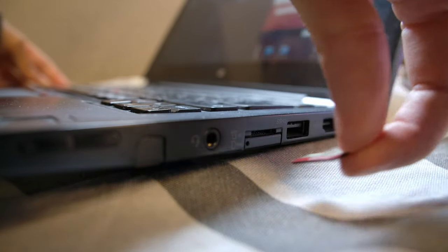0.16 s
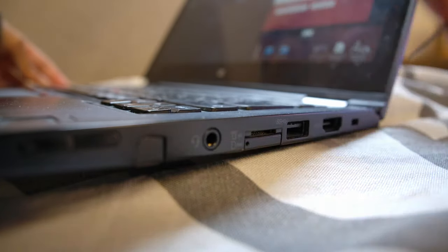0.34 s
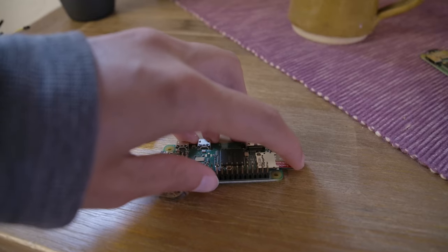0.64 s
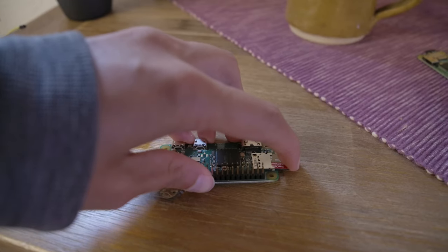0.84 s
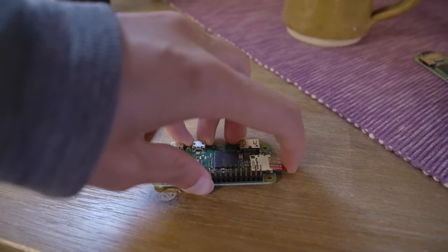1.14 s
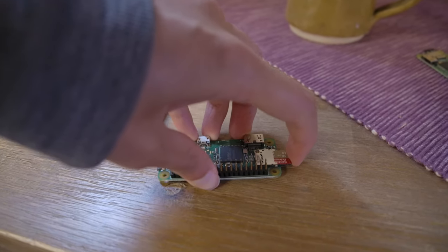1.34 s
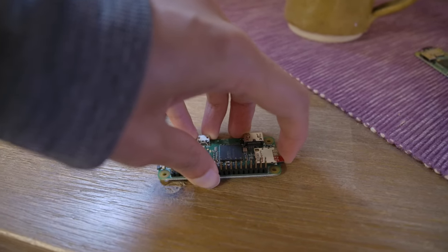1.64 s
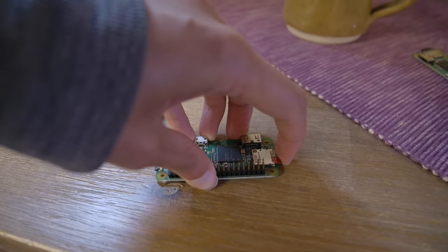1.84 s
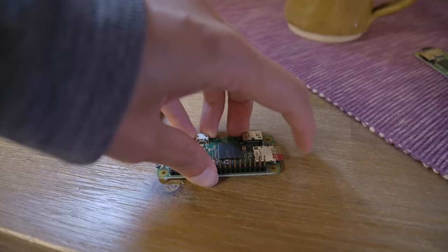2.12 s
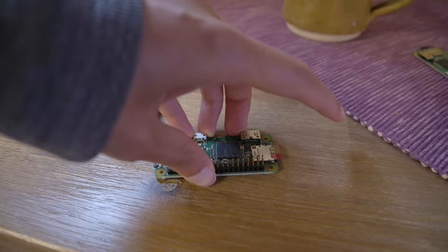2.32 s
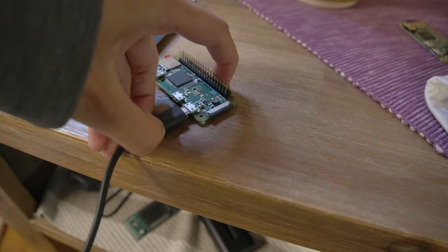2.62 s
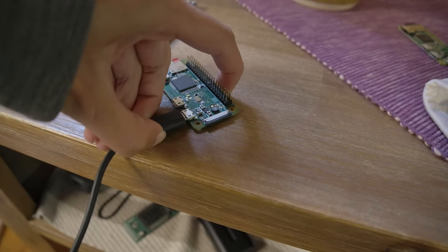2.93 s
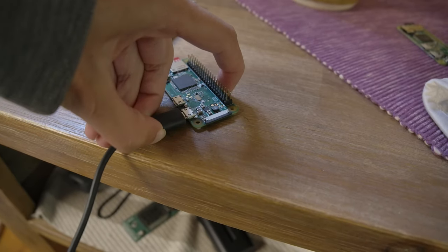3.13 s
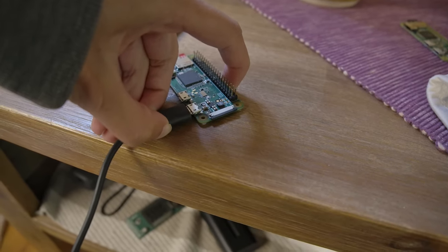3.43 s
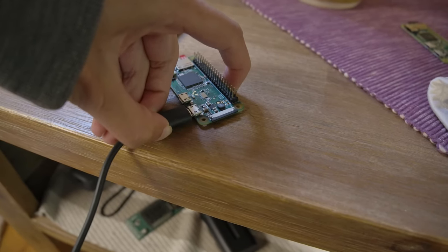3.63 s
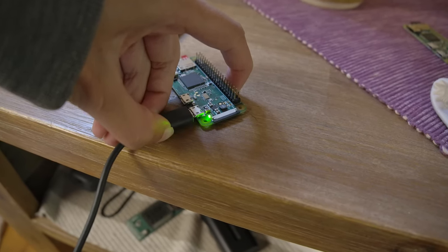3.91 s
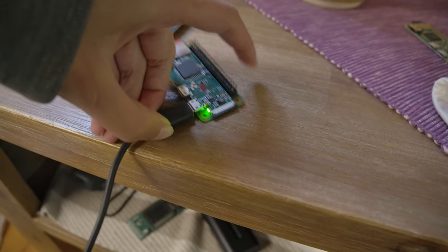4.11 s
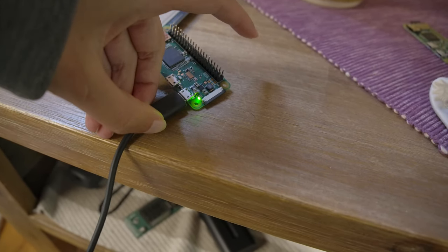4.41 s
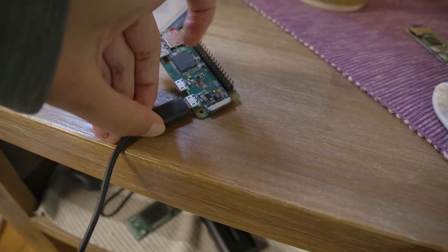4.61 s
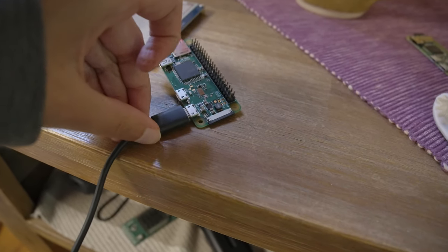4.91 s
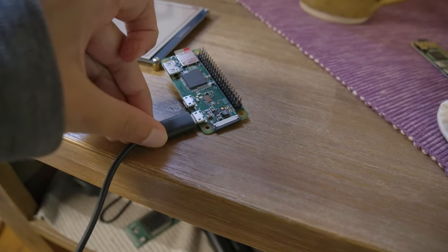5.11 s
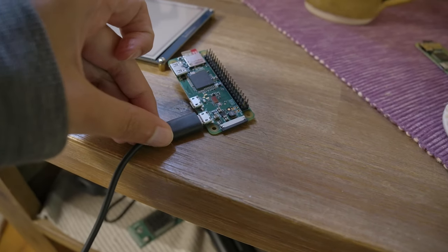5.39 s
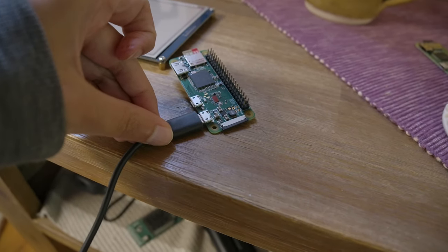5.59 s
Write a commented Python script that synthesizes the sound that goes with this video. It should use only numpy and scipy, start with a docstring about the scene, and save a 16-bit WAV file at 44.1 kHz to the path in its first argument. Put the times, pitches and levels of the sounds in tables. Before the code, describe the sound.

In a quiet hissy room, a tiny card clicks in, a cable plug snaps home with a short metallic ring, and a circuit board skids down.

```python
"""A small bare circuit board is handled on a wooden desk, close by in a quiet room: a memory card clicks
in a laptop's slot and is pushed into the board, a USB plug knocks and snaps into its metal socket, and
the board scuffs back down. Contacts are spikes with coloured noise rings, the desk and socket add dying
sines, and sliding is gritty noise in smooth swells. Fingers rub faintly over hiss and a thin whine."""
import sys
import numpy as np
from scipy import signal
from scipy.io import wavfile
from scipy.ndimage import uniform_filter1d

SR = 44100
rng = np.random.default_rng(int(sys.argv[2]) if len(sys.argv) > 2 else 0)


def store_pcm(level_fs):
    """Save levels as 16-bit WAV."""
    pcm = np.round(np.clip(level_fs, -1, 1) * 32767).astype(np.int16)
    wavfile.write(sys.argv[1], SR, np.atleast_2d(pcm).T)


N = 253575
TIME = np.arange(N) / SR
RING = TIME[:SR // 2]  # the half second given to every ring


def amp(db):
    """Decibels to gain."""
    return 10 ** (np.asarray(db) / 20)


def read(points, hz):
    """Reads a table of values against frequency on a log-frequency axis."""
    f, value = np.transpose(points)
    return np.interp(np.log(hz + 1), np.log(f + 1), value)


def add(mix, s, sound):
    """Mixes a stereo sound in at time s."""
    part = mix[:, max(round(s * SR), 0):][:, :sound.shape[1]]
    part += sound[:, :part.shape[1]]


def unit(x):
    """Scales each channel to energy 1."""
    return x / np.sqrt(np.sum(x ** 2, axis=-1, keepdims=True) + 1e-20)


def colour(x, spectrum, size=4096):
    """Causal (minimum-phase) filter with the given spectrum, so attacks stay sharp."""
    db = np.maximum(read(spectrum, abs(np.fft.fftfreq(size, 1 / SR))), -100)
    minimum_phase = np.exp(signal.hilbert(np.log(amp(db))).conj())
    taps = np.fft.ifft(minimum_phase).real[:size // 2]
    if x.ndim > 1:
        taps = taps[None]
    return signal.fftconvolve(x, taps, axes=-1)[..., :x.shape[-1]]


# stereo width of close sounds: f/Hz, side against mid/dB
NEAR_WIDTH = [(200, -29), (1000, -19), (4000, -15), (7000, -6.5), (15000, -8)]


def stereo(pair, width=NEAR_WIDTH):
    """Left and right from a mid and a side signal."""
    mid = pair[0]
    side = colour(pair[1], width)
    return np.array([mid + side, mid - side])


def noise(spectrum, width=NEAR_WIDTH, grit_db=0):
    """Stereo noise with mid rms 1; grit flickers its level over milliseconds, as catching and slipping."""
    wander = unit(uniform_filter1d(rng.standard_normal(N), 128)) * np.sqrt(N)
    catches = np.tanh(wander)
    pair = colour(rng.standard_normal((2, N)) * amp(grit_db * catches), spectrum)
    return stereo(unit(pair) * np.sqrt(N), width)


def clicks(rows, spectrum, width=NEAR_WIDTH):
    """Each contact is a spike with the dense, quickly dying ring of small stiff parts."""
    pair = np.zeros((2, N))
    for s, db, t60, spike in rows:
        share = np.clip(spike, 0, 1)  # of the mid energy
        burst = unit(rng.standard_normal((2, len(RING))) * amp(-60 * RING / t60))
        burst[0] *= np.sqrt(1 - share)
        burst[0, 0] -= np.sqrt(share)
        add(pair, s, amp(db) * burst)
    return stereo(colour(pair, spectrum), width)


def swell(middle, length):
    """A smooth rise to 1 and fall back to silence."""
    return np.cos(np.pi * np.clip((TIME - middle) / length, -.5, .5)) ** 2


def strokes(rows):
    """Gain over time of sliding strokes, one swell each; overlapping strokes add in power."""
    return np.sqrt(sum((amp(db) * swell(middle, length)) ** 2 for middle, length, db in rows))


# louder early bed: spectrum f/Hz, level/dB; width f/Hz, side against mid/dB
EARLY_HISS_COLOUR = [(20, -35), (30, -4), (53, 1.5), (103, 2), (141, -2.5), (233, -3.5), (280, -7.5),
                     (426, -9.5), (666, -11.5), (1100, -15.5), (6500, -18), (12300, -18.5), (14800, -17.5),
                     (16000, -24.5)]
EARLY_HISS_WIDTH = [(60, -4.5), (180, -3), (550, -1), (1650, -0.5), (5000, -0.5), (15000, 0.5)]
# softer late bed: spectrum f/Hz, level/dB; width f/Hz, side against mid/dB
LATE_HISS_COLOUR = [(18, -30), (30, -3), (55, 0.5), (70, -3), (109, 0), (221, -8.5), (287, -10),
                    (526, -13.5), (962, -15), (1250, -16.5), (1460, -17.5), (2350, -19), (2900, -18.5),
                    (9710, -20), (16000, -22)]
LATE_HISS_WIDTH = [(60, -6), (180, -1), (550, -0.5), (1650, -0.5), (5000, -0.5), (15000, 1)]
EARLY_HISS_DB, LATE_HISS_DB = -48, -58.5  # mid rms, before the low cut
HISS_FADE_START_S, HISS_FADE_END_S = 1.86, 2.85
HISS_DIP_S, HISS_DIP_LENGTH_S, HISS_DIP_DEPTH = 0.517, 0.28, 0.22  # depth 0-1
WHINE_HZ, WHINE_DB = 10000, -68.5


def background(whine_drop_db=-8):
    """Room rumble and microphone hiss as coloured noise, louder at first, with a thin electronic sine whine."""
    early = np.interp(TIME, [HISS_FADE_START_S, HISS_FADE_END_S], [1, 0])
    late = np.sqrt(np.clip(1 - early ** 2, 0, 1))
    dip = 1 - HISS_DIP_DEPTH * swell(HISS_DIP_S, HISS_DIP_LENGTH_S)  # the early level dips briefly
    early_hiss = dip * early * amp(EARLY_HISS_DB) * noise(EARLY_HISS_COLOUR, EARLY_HISS_WIDTH)
    late_hiss = late * amp(LATE_HISS_DB) * noise(LATE_HISS_COLOUR, LATE_HISS_WIDTH)
    whine_gain = amp(WHINE_DB) * (early + amp(whine_drop_db) * late)
    return early_hiss + late_hiss + whine_gain * np.sin(2 * np.pi * WHINE_HZ * TIME)


# decay of the room: f/Hz, t60/s
ROOM_T60 = [(150, 0.36), (500, 0.18), (1500, 0.18), (4000, 0.17), (14000, 0.17)]
# tone of the reflections: f/Hz, level/dB
ROOM_COLOUR = [(100, -19.5), (400, -15.5), (1500, -10.5), (3000, -19), (7000, -20), (15000, -21)]


def room(x, wet_db=-2, gap=0.0048, side_db=-10):
    """Short diffuse reflections of a furnished room: noise dying at its own rate in each band."""
    hz, t, grid = signal.stft(rng.standard_normal((2, len(RING))), SR, nperseg=256)
    decay = amp(-60 * t / read(ROOM_T60, hz)[:, None])
    tail = signal.istft(grid * decay, SR, nperseg=256)[1][:, :len(RING)]
    onset = np.clip(RING / gap - 1, 0, 1)  # silent for one gap, then rising over another
    tail = colour(unit(tail * onset), ROOM_COLOUR)
    tail = stereo(tail, [(100, side_db), (10000, 0.018)])
    return amp(wet_db) * signal.fftconvolve(x, tail, axes=1)[:, :N]


# soft rustles: middle t/s, length/s, level/dB
RUSTLES = [(.03, .22, -51.5), (.3, .6, -55.5)]
# tone of cloth: f/Hz, level/dB
RUSTLE_COLOUR = [(100, -2), (300, -20), (1000, 9), (2500, 0), (6000, -12), (14000, -8.5)]


def cloth_rustles():
    """The hand over cloth: smooth swells of noise."""
    return strokes(RUSTLES) * noise(RUSTLE_COLOUR)


# fingers on board and plug, one stroke each: middle t/s, length/s, level/dB
RUBS = [(2.55, 0.2, -57.5), (2.84, 0.19, -53.5), (2.94, 0.14, -49), (3.16, 0.49, -58.5), (3.31, 0.2, -58),
        (4.07, 0.16, -60), (4.3, 0.16, -60), (4.65, .17, -57), (4.95, 0.53, -59.5), (5.37, 0.11, -63.5)]
# tone of the rubbing: f/Hz, level/dB
RUB_COLOUR = [(150, -12), (250, 7.5), (340, -4), (450, -1), (620, -9.5), (950, -12.5), (1400, -17),
              (1900, -19.5), (2350, -13), (2900, -24), (5500, -23), (9000, -47)]
GRIP_START_S, GRIP_DB = 2.5, -70.5


def finger_rubs():
    """Skin catches and slips over board and plug as gritty noise; the holding hand never rests completely."""
    fingers = np.hypot(strokes(RUBS), amp(GRIP_DB) * (TIME > GRIP_START_S))
    return fingers * noise(RUB_COLOUR, grit_db=3.5)


# squeaks under a sliding finger: middle t/s, length/s, level/dB
SQUEAKS = [(3.21, 0.3, -60.5), (4.97, .3, -76), (5.19, 0.27, -69.5)]
# narrow tone of the plastic: f/Hz, level/dB
SQUEAK_COLOUR = [(1500, -40), (2100, -12), (2350, 1), (2600, -11), (3500, -27)]


def plastic_squeaks():
    """Plastic sings faintly under a sliding finger: swells of narrow-band noise."""
    return strokes(SQUEAKS) * noise(SQUEAK_COLOUR)


# card in the laptop's slot: t/s, level/dB before colour, t60/s, share of clean spike/0-1
SLOT = [(0.0002, 3, 0.011, 0.11), (0.003, -10.5, 0.069, 0)]
# tone of the slot: f/Hz, level/dB
SLOT_COLOUR = [(400, -23), (1000, -8), (2000, -6), (3200, -14.5), (4300, 4), (5500, -12), (7000, -19),
               (9000, -11), (15000, -38)]


def laptop_slot():
    """The card clicks in a laptop's slot: short coloured contacts."""
    return clicks(SLOT, SLOT_COLOUR)


# small ticks of card, pins and plug: t/s, level/dB before colour, f/Hz
TICKS = [(2.1462, -2.5, 5970), (2.1485, -1, 1480), (2.153, -0.5, 1470), (2.6669, 9.5, 2390),
         (2.6778, 3, 10000), (2.836, -15.5, 5100), (4.1042, -18, 14100), (4.534, -26, 4160)]


def ticks(t60=0.013, skirt_db=-28, spike=0.22):
    """Each tick of a small part is a short burst about one pitch."""
    out = np.zeros((2, N))
    for s, db, hz in TICKS:
        # skirts half an octave either side
        peak = [(hz / 2 ** .5, skirt_db), (hz, 0), (hz * 2 ** .5, skirt_db)]
        out += clicks([(s, db, t60, spike)], peak)
    return out


# fingertips and plug on the board: t/s, level/dB before colour, t60/s, share of clean spike/0-1
NUDGES = [(2.516, -8.5, 0.016, 0.5), (2.542, -5.5, 0.032, 0.4), (2.826, -10, 0.09, 0.03),
          (2.845, -4, 0.06, 0.05), (2.875, -10, 0.028, 0.2), (2.904, -9, .04, 0.3),
          (2.928, -1.5, 0.041, 0.2), (4.036, -11.5, 0.034, 0.4), (4.106, -7.5, 0.087, 0.3),
          (4.534, -19, .02, .6)]
# tone of the nudged board: f/Hz, level/dB
NUDGE_COLOUR = [(120, -28), (250, -0.5), (450, -32), (650, -12), (820, -0.5), (1020, 0), (1300, -19),
                (1650, -18), (2050, -7.5), (2900, -26), (5000, -26), (8000, -33), (15000, -28)]


def nudges():
    """Fingertips and plug nudge the board: contacts with the board's tone."""
    return clicks(NUDGES, NUDGE_COLOUR)


# board sliding on wood: middle t/s, length/s, scuff level/dB, solder-point hiss level/dB
SLIDES = [(2.566, .065, -48.5, -76), (4.155, 0.073, -32.5, -58), (4.197, 0.095, -43, -51.5),
          (4.235, 0.1, -54, -76)]
# tone of board on wood: f/Hz, level/dB
SCUFF_COLOUR = [(150, -32), (240, 3), (350, -13), (470, -2.5), (590, -10), (760, 4.5), (900, -14),
                (1030, -16), (1250, -19), (2200, -17), (3000, -25), (5700, -28), (9000, -43)]
# bright hiss of the solder points: f/Hz, level/dB
GRAIN_COLOUR = [(2000, -34), (5500, 3), (10000, -4), (14500, 3.5), (16500, -6.5)]


def board_scuffs():
    """The board slides on the wood: low gritty scuffing with a bright hiss of solder points."""
    middle, length, scuff_db, grain_db = np.transpose(SLIDES)
    scuff = strokes(zip(middle, length, scuff_db)) * noise(SCUFF_COLOUR, grit_db=4.5)
    grain = strokes(zip(middle, length, grain_db)) * noise(GRAIN_COLOUR, grit_db=3)
    return scuff + grain


CHATTER_START_S, CHATTER_GAP_S, CHATTER_HZ = 4.1296, .0095, 770
CHATTER_DB, CHATTER_GROWTH_DB = -35.5, 3  # first hop, rise per hop


def chatter(count=4):
    """The skidding board hops evenly, each hop a harder blow on the desk."""
    return [(CHATTER_START_S + k * CHATTER_GAP_S, CHATTER_DB + k * CHATTER_GROWTH_DB, CHATTER_HZ)
            for k in range(count)]


def modes(table, decay_time=RING):
    """One dying sine for each mode."""
    return np.array([amp(db - 60 * decay_time / t60) * np.sin(2 * np.pi * hz * RING)
                     for hz, db, t60 in table])


# blows that reach the desk top: t/s, level/dB on top of the desk's own levels, centre f/Hz
BLOWS = [(1.149, -38.5, 238), (1.5534, -20.5, 250), (2.07, -36, 487), (2.149, -36.5, 310),
         (2.6652, -31, 547), (2.6674, -16, 700), (2.6788, -22.5, 657), (2.6820, -31.5, 262),
         (2.9749, -22, 1004), (2.9762, -25, 254), (4.035, -44, 250), (4.1638, -29, 243),
         (4.197, -30.5, 230), (4.217, -32.5, 465), (4.255, -41.5, 465)]
# modes of the desk top with the board on it: f/Hz, level/dB within one blow, t60/s
DESK_MODES = [(103, -14.5, 0.11), (239.2, -6.5, 0.11), (256.9, -12, 0.22), (317, -4.5, 0.033),
              (386, -13, 0.13), (465, -19, 0.2), (555, -20.5, 0.23), (671, -6, 0.05), (757, -13.5, 0.14),
              (860, -2, 0.018), (1012, -6, 0.046), (1358, -3, 0.036), (1570, -25, 0.24), (1937, 1.5, 0.057),
              (2500, 1.5, 0.05)]


def desk(focus_db=11.0, push_db=16, wash_db=15, wash_t60=0.2):
    """A blow pushes the top and rings the modes near its own centre most: soft ones thud, hard ones clack."""
    out = np.zeros((2, N))
    rings = modes(DESK_MODES)
    hz = np.transpose(DESK_MODES)[0]
    signs = (-1) ** (np.arange(len(DESK_MODES)) // 3)  # parts of the top swing against each other
    octaves = np.arange(-4, 5)
    for s, db, centre_hz in BLOWS + chatter():
        focus = amp(-focus_db * abs(np.log2(hz / centre_hz)))
        ring = (signs * focus) @ rings
        # the many weaker modes
        wash = amp(wash_db) * unit(rng.standard_normal(len(RING)) * amp(-60 * RING / wash_t60))
        wash[0] += amp(push_db)
        blow_colour = np.transpose([centre_hz * 2. ** octaves, -focus_db * octaves ** 2 / 2])
        mono = ring + colour(wash, blow_colour)
        add(out, s, amp(db) * np.tile(mono, (2, 1)))
    return out


# board's edge on the wood: t/s, level/dB before colour, t60/s, share of clean spike/0-1
BOARD_TAPS = [(4.1590, 0, 0.019, .5), (4.1622, -5.5, .025, 0.03)]
# tone of the edge: f/Hz, level/dB
BOARD_COLOUR = [(500, -16), (1200, -9), (2500, -3), (4500, -16), (6000, -7.5), (9000, -16), (14500, -13),
                (16500, -32)]


def board_taps():
    """The board's edge taps the wood: short coloured contacts."""
    return clicks(BOARD_TAPS, BOARD_COLOUR)


# card scrapes in, seats, and the fingernail slips off: t/s, level/dB before colour, t60/s,
# share of clean spike/0-1
CARD = [(1.5474, 3, 0.016, 0.2), (1.5486, 8, 0.0056, 0.15), (1.5510, 9, 0.01, 0.05),
        (1.5523, 5.5, 0.015, 0.1), (1.5620, 8, 0.0087, .1), (1.5640, -3, 0.018, 0.4),
        (2.1458, -3.5, 0.009, 0.2)]
# tone of the card: f/Hz, level/dB
CARD_COLOUR = [(400, -4), (950, -8), (2400, -7), (3900, -12.5), (5000, -10.5), (6900, -6), (7900, -18.5),
               (9500, -8), (11000, -8), (14300, -0.5), (16500, -6)]
# seating jolts the board: t/s, level/dB before colour, t60/s, share of clean spike/0-1
THUMP = [(1.5492, 10, 0.022, 0.5), (1.5528, 19, 0.035, 0.4), (1.5575, 17.5, 0.075, 0.3),
         (1.5628, 14, 0.02, 0.4), (1.5660, 15, 0.33, 0.02)]
# low tone of the jolt: f/Hz, level/dB
THUMP_COLOUR = [(50, -36), (90, 1.5), (150, -27.5), (250, 0), (370, -5.5), (530, -6), (780, -13.5),
                (1020, -10), (1250, -16.5), (1600, -12), (2100, -29), (3000, -20.5), (6000, -54)]


def card_into_board():
    """Bright contacts of the card, and the low thump as it jolts the board held flat on the desk."""
    return clicks(CARD, CARD_COLOUR) + clicks(THUMP, THUMP_COLOUR)


# plug against the board: t/s, level/dB before colour, t60/s, share of clean spike/0-1
PLUG = [(2.6654, 5, 0.0066, 0.5), (2.6672, 6.5, 0.019, 0.13), (2.6757, -2, 0.014, 0.7),
        (2.6777, 10, 0.016, 0.2), (2.6808, -1, 0.023, 0.4), (2.6848, -0.5, 0.038, 0.3)]
# tone of the plug: f/Hz, level/dB
PLUG_COLOUR = [(70, -26), (200, -11.5), (450, -12), (720, 7.5), (1200, -10), (2300, -4.5), (2900, -5.5),
               (3550, -4), (4400, -12.5), (5500, -6), (7000, -20), (8400, -32), (9800, -12.5), (12000, -29),
               (16000, -23)]


def plug_knocks():
    """The plug knocks against the board: a cluster of coloured contacts."""
    return clicks(PLUG, PLUG_COLOUR)


# spring catches slide and snap home: t/s, level/dB before colour, t60/s, share of clean spike/0-1
LATCH = [(2.9712, -11, .015, 0), (2.9734, 13, 0.0074, 0.03), (2.9740, 10, 0.014, 0.02),
         (2.975, 1, 0.067, 0.1), (2.989, -10, 0.02, 0)]
# tone of the catches: f/Hz, level/dB
LATCH_COLOUR = [(70, -23), (350, -18), (900, -6), (1300, -20), (2000, 1.5), (3300, -4), (3950, -1.5),
                (4350, -13), (4750, 1.5), (5650, 4), (6250, -18), (7000, -2), (8500, -19), (10900, -5),
                (14200, -13), (16500, -14)]
# stereo width of snap and socket: f/Hz, side against mid/dB
LATCH_WIDTH = [(500, -26), (2000, -14), (4000, -9), (5300, -3.5), (7000, -1), (10000, 1), (15000, -10)]


def plug_snap():
    """The plug's spring catches slide and snap home: contacts that ring as dense noise."""
    return clicks(LATCH, LATCH_COLOUR, LATCH_WIDTH)


# tone of the metallic wash: f/Hz, level/dB
SHELL_COLOUR = [(150, -4.5), (450, -2.5), (680, -18), (860, -1), (1400, -9), (2000, 0), (2500, -7),
                (4300, -7), (5300, -1.5), (6400, -16), (7100, -11.5), (7900, -20), (12000, -24),
                (16000, -25)]
# clear modes of socket shell and pins: f/Hz, level/dB, t60/s
SHELL_MODES = [(218, -38.5, 0.055), (832, -50.5, 0.31), (970, -48, 0.2), (1970, -49, 0.2),
               (4860, -52, 0.36), (5160, -55, .3), (5308, -52, .3), (5572, -56, 0.3), (5850, -63, .18),
               (6070, -62, 0.77), (7100, -50, 0.15), (6760, -49, 0.18)]


def socket_ring(ring_db=8, t60=0.41, hold=0.054, modes_db=0):
    """After the snap, a metallic wash and clear modes hold their level briefly, then die away."""
    out = np.zeros((2, N))
    dying = np.maximum(RING - hold, 0)  # level through the hold, then decaying
    wash = unit(rng.standard_normal((2, len(RING))) * amp(-60 * dying / t60))
    ring = modes(SHELL_MODES, dying).sum(axis=0)
    ring_pair = np.array([ring, signal.hilbert(ring).imag])  # side a quarter cycle from mid
    pair = amp(ring_db) * colour(wash, SHELL_COLOUR) + amp(modes_db) * ring_pair
    snap_s = LATCH[1][0]
    add(out, snap_s, stereo(pair, LATCH_WIDTH))
    return out


def scene():
    """Contacts and desk excite the room; background, sliding and socket ring are added dry."""
    small_parts = laptop_slot() + ticks() + nudges()
    board = desk() + board_taps() + card_into_board()
    close = small_parts + board + plug_knocks() + plug_snap()
    sliding = cloth_rustles() + finger_rubs() + plastic_squeaks() + board_scuffs()
    return background() + room(close) + sliding + close + socket_ring()


def record(dry, low_cut_hz=42, edge_hz=16250):
    """The recorder's low cut and upper band limit."""
    low_cut = signal.butter(6, low_cut_hz, "highpass", fs=SR, output="sos")
    band_limit = signal.firwin(301, edge_hz, window=("kaiser", 8), fs=SR)
    return signal.oaconvolve(signal.sosfilt(low_cut, dry), band_limit[None], "same")


dry = scene()
out = record(dry)
store_pcm(out)
```